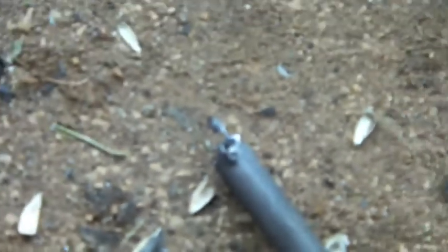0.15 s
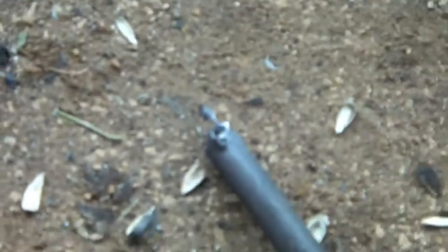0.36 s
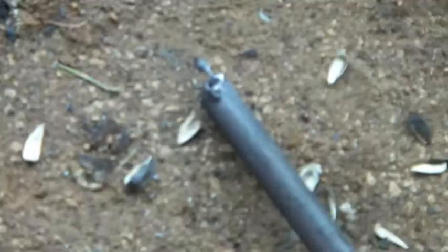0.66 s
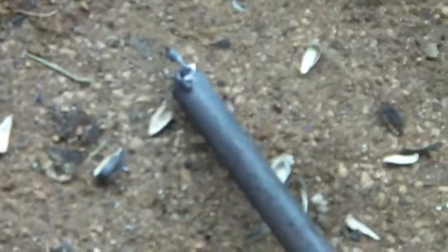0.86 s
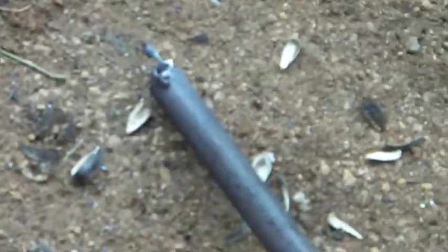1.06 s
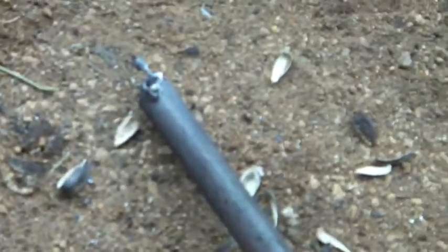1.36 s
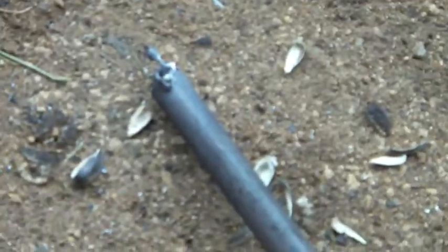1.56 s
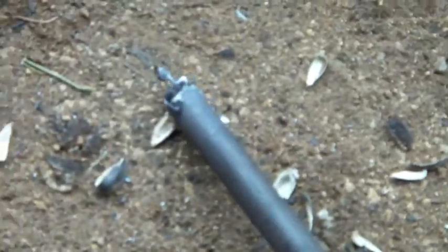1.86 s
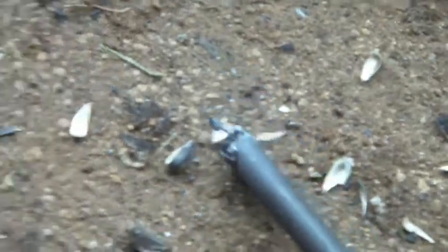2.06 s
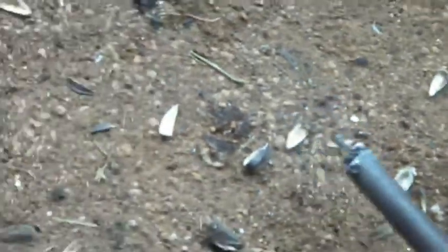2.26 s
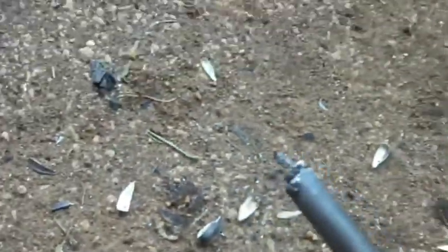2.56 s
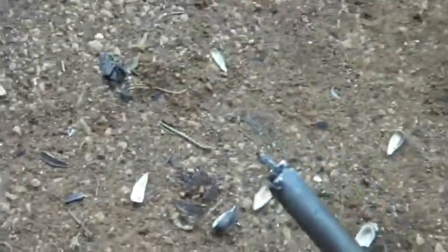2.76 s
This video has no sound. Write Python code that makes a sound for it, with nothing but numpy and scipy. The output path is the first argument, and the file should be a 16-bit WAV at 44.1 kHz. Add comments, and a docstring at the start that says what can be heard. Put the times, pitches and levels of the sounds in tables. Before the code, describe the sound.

Steady blower whine and rushing air through pipes outdoors, interrupted by a short hollow thumping and scraping

```python
"""First a steady whistle over roaring, hissing air: an electric blower feeds an outdoor furnace through pipes.
The whistle is sine partials of the impeller; roar and hiss are shaped noise, the roar also through pipe resonances.
Nearby something hollow is bumped and dragged: gliding sine modes make thumps, low noise its rumble.
Small hard taps ring decaying modes, and short noise bursts are grit scraping on the ground.
A pair of close microphone ports listens."""
import sys
import numpy as np
from scipy import signal
from scipy.fft import rfft, irfft, next_fast_len
from scipy.io import wavfile
from scipy.ndimage import uniform_filter1d, map_coordinates

SR = 44100
rng = np.random.default_rng(int(sys.argv[2]) if len(sys.argv) > 2 else 0)


def master_out(mix):
    """Clip the mix to full scale and print it as 16-bit PCM to the path in sys.argv[1]."""
    frames = np.transpose(np.atleast_2d(mix))
    ceiling = np.clip(frames, -1, 1)
    pcm = np.round(ceiling * 32767).astype(np.int16)
    wavfile.write(sys.argv[1], SR, pcm)


N = 127890
TIME_S = np.arange(N) / SR

# Low rumble of the thing being dragged: time_s [s], level_db [dB]
DRAG_LEVEL = [(.52, -80), (.57, -33), (.8, -31), (1.0, -32), (1.2, -34), (1.3, -62.5)]
# Colour of that rumble: freq_hz [Hz], relative_db [dB per Hz]
DRAG_COLOUR = [(60, -42), (100, -12.5), (170, -15), (240, 7), (300, 2.5), (400, -44)]

# Grit scrapes: start_s [s], level_db [dB], rise_s [s], decay_s [s]
SCRAPES = [(.682, -21.5, 0.0052, 0.0074), (.768, -26, .004, 0.0096), (0.8019, -16, .0008, 0.005),
           (0.815, -25, 0.0018, .008), (.832, -31, 0.0034, 0.013), (.965, -33.5, 0.032, 0.015),
           (1.02, -30, 0.013, .012), (1.04, -29, .008, 0.011)]
# Colour of the grit: freq_hz [Hz], relative_db [dB per Hz]
GRIT_COLOUR = [(700, -36), (1400, 3.5), (3000, -4.5), (5000, -5.5), (8000, -10.5), (12000, -15.5)]
GRIT_ROUGH_DB = 2

# Taps on a small hard thing: start_s [s], strike_db [dB], most excited pitch_hz [Hz]
TAPS = [(.669, -20.5, 3000), (.676, -20, 1500), (.687, -17.5, 2500), (0.694, -22.5, 5200),
        (.706, -17, 1800), (0.772, -19.5, 2000), (0.8021, -16, 3360), (0.8033, -16, 1900),
        (0.8047, -15.5, 1600), (0.8122, -23.5, 3000), (0.8178, -24, 4400), (.997, -23, 3400)]
# Ringing modes of the tapped thing: pitch_hz [Hz], relative_db [dB], t60_s [s]
TAP_MODES = [(1466, 0, .03), (1796, -1, 0.062), (2477, -3.5, .04), (2740, -0.5, 0.022), (2960, -4, 0.043),
             (3400, -5, 0.016), (3660, 2.5, .018), (4180, -4, .018), (4400, -5, 0.018), (5080, -12, .018),
             (5300, 0.5, 0.023)]
TAP_FALL_DB = 12  # lost per octave away from the most excited pitch
TAP_RISE_S = .0003

# Hollow thumps: start_s [s], strike_db [dB], pitch_hz [Hz], glide_hz_per_s [Hz/s]
THUMPS = [(.558, -9.5, 235.5, 700), (0.659, -15, 235, 400), (.69, -14, 272, 100), (.724, -12.5, 220, -100),
          (.745, -16.5, 240, -200), (0.786, -17, 212, 0), (.862, -9.5, 234, 150), (.911, -18, 200, 0),
          (.977, -10, 284, 95), (1.089, -19, 258, 0), (1.155, -11.5, 234, 150), (1.17, -15.5, 172, -4),
          (1.22, -18, 176, 0)]
# Modes of the hollow thing: ratio to pitch [1], relative_db [dB]
HOLLOW_MODES = [(1, 3), (0.487, -12.5), (1.3, -8.5)]
THUMP_T60_S, THUMP_RISE_S = 0.13, 0.0085
THUMP_CUT_HZ = 127  # the microphone's bass roll-off, as it dulls the bumps

# Course of the rushing air, before the trims: time_s [s], roar_db [dB], hiss_db [dB]
AIR_LEVEL = [(0, -19, -27.5), (.3, -19.5, -26.5), (.52, -19, -27), (0.89, -21, -28), (0.98, -21.5, -26.5),
             (1.12, -19, -27.5), (1.31, -21.5, -28), (1.42, -19.5, -27.5), (1.8, -20, -27.5),
             (1.92, -18.5, -26.5), (2.19, -20.5, -27.5), (2.9, -20, -28)]
ROAR_TRIM_DB, HISS_TRIM_DB = 1.28, 2.34
GUST_DB = 0.18  # random swells of the roar
# Colour of the roar: freq_hz [Hz], relative_db [dB per Hz]
ROAR_COLOUR = [(18, -81), (30, -62), (102, -31.5), (158, -17.5), (214, -15.5), (305, -8), (353, -3.5),
               (402, -3), (460, -0.5), (515, 2.5), (560, -3.5), (622, -10.5), (700, -6.5), (910, -60),
               (1540, -120)]
# Pipe resonances: centre_hz [Hz], width_hz [Hz], relative_db [dB]
PIPE_MODES = [(718, 125, -0.5), (769, 45, -0.5), (864, 126, -3), (954, 120, 0), (1241, 28, -5),
              (1554, 110, -11)]
PIPE_DB = -5  # against the roar
# Colour of the hiss: freq_hz [Hz], relative_db [dB per Hz]
HISS_COLOUR = [(600, -23.5), (1000, -5.5), (1400, -11), (1900, -14.5), (2500, -14.5), (3200, -16),
               (3800, -20), (5000, -19.5), (6500, -22.5), (8000, -24.5), (10000, -29.5), (11000, -26.5),
               (11600, -33.5), (12300, -51)]
# Narrow dips in the rush of air: centre_hz [Hz], width_hz [Hz], gain_db [dB]
AIR_DIPS = [(693, 24.5, -10), (803, 24, -5.5)]

# Course of the blade whistle: time_s [s], level_db [dB]
WHISTLE_LEVEL = [(0, -25), (.06, -28), (.15, -21), (.26, -21.5), (.36, -20), (.65, -21), (.78, -22.5),
                 (.95, -17), (1.08, -21), (1.22, -22), (1.38, -19), (1.9, -18.5), (2.15, -19), (2.35, -16),
                 (2.65, -17.5), (2.9, -17.5)]
# Shaft tones: multiple of the shaft speed [1], level_db against the mean whistle [dB], waver_db [dB]
SHAFT_ORDERS = [(1, -26, 4), (2, -11, 2.5)]
# Faint motor tones: pitch_hz [Hz], level_db [dB rms, before the waver]
MOTOR_TONES = [(2535, -52), (4409, -60)]
SHAFT_HZ, DRIFT_HZ, BLADES = 178.8, 0.061, 5
RIPPLE_HZ, RIPPLE_DEPTH = 118, 0.15  # torque ripple that swells the whistle
WHISTLE_WAVER_DB, MOTOR_WAVER_DB = -0.04, 6
OVERTONE_DB, OVERTONE_GROWS = -26, 1.9  # second partial against the mean whistle; swings wider than it

# Likeness of the noise at the two ports: freq_hz [Hz], left-right correlation [1]
PORT_LIKENESS = [(100, .99), (600, 0.98), (1200, 0.91), (2600, 0.82), (5500, 0.73), (8000, 0.22),
                 (11700, 0.92)]
# Balance of the ports: freq_hz [Hz], left_over_right_db [dB]
PORT_BALANCE = [(60, 1.5), (170, 1), (490, 0.5), (1420, 0.5), (4080, -0.5), (11700, -0.5)]
LEFT_LAG_S = .00003
TOP_HZ = 12300


def amp(db):
    """dB to gain."""
    return 10 ** (np.asarray(db) / 20)


def unit(x):
    """Scaled to rms 1."""
    return x / np.sqrt(np.mean(x ** 2) + 1e-20)


def along(points, hz):
    """Values of (Hz, value) points read along a log frequency axis."""
    f, v = np.transpose(points)
    return np.interp(np.log(hz + 1), np.log(f + 1), v)


def over_time(points):
    """Values of (s, value) points joined by straight lines."""
    return np.interp(TIME_S, *np.transpose(points))


def wobble(rate):
    """A smooth random curve, rate knots a second."""
    knots = rng.standard_normal(int(N * rate / SR) + 4)
    return map_coordinates(knots, [np.arange(N) * rate / SR])


def filtered(x, response):
    """x times a complex response of frequency."""
    m = next_fast_len(N + SR // 2)
    return irfft(rfft(x, m) * response(np.fft.rfftfreq(m, 1 / SR)), m)[..., :N]


def shape(spectrum):
    """Gain of (Hz, dB) points, silent below half the first and level above the last."""
    return lambda hz: amp(along(spectrum, hz)) * (hz >= spectrum[0][0] / 2)


def resonance(hz, centre_hz, width_hz):
    """Bell of height 1, down to a half at the edges of its width."""
    return 1 / (1 + ((hz - centre_hz) / (width_hz / 2)) ** 2)


def rush(gain, patchy_db):
    """Stereo noise of rms 1, its time-frequency patches randomly louder or softer."""
    z = signal.stft(rng.standard_normal((2, N)), nperseg=512)[2]
    field = rng.standard_normal(z.shape[1:])
    field = uniform_filter1d(uniform_filter1d(field, 8, 0), 10, 1)
    pair = signal.istft(z * amp(patchy_db * unit(field)), nperseg=512)[1][:, :N]

    def mid_side_gain(hz):
        # the angle between mid and side sets the likeness of left and right
        angle = np.arccos(np.clip(along(PORT_LIKENESS, hz), -1, 1)) / 2
        return gain(hz) * np.array([np.cos(angle), np.sin(angle)])

    mid, side = filtered(pair, mid_side_gain)
    return unit(np.array([mid + side, mid - side]))


def drag():
    """Lumpy low noise of a thing dragged along."""
    level_db = over_time(DRAG_LEVEL) + 2.6 * wobble(14.9)
    return amp(level_db) * rush(shape(DRAG_COLOUR), patchy_db=1.1)


def scrapes():
    """Quick rough bursts of grit: a straight rise, then an exponential tail."""
    stroke = np.zeros(N)
    for start_s, level_db, rise_s, decay_s in SCRAPES:
        age_s = TIME_S - start_s
        rise = np.clip(age_s / rise_s, 0, 1)
        tail = np.exp(-np.clip(age_s - rise_s, 0, None) / decay_s)
        stroke += amp(level_db) * rise * tail
    roughness = amp(GRIT_ROUGH_DB * wobble(700))
    return stroke * roughness * rush(shape(GRIT_COLOUR), patchy_db=1.0)


def taps():
    """Each tap rings the same modes, most of all those near its own pitch."""
    out, t = np.zeros(N + SR), np.arange(SR // 8) / SR
    for start_s, strike_db, centre_hz in TAPS:
        ring = np.zeros(len(t))
        for hz, mode_db, t60_s in TAP_MODES:
            far_db = TAP_FALL_DB * abs(np.log2(hz / centre_hz))
            level_db = mode_db - far_db + rng.normal(0, 1.7) - 60 * t / t60_s
            ring += amp(level_db) * np.sin(2 * np.pi * hz * t + rng.uniform(0, 2 * np.pi))
        start = round(start_s * SR)
        out[start:start + len(t)] += amp(strike_db) * (1 - np.exp(-t / TAP_RISE_S)) * ring
    return out[:N]


def thumps():
    """Soft bumps that ring a hollow thing's low modes, gliding in pitch as they die."""
    out, t = np.zeros(N + SR), np.arange(SR // 4) / SR
    for start_s, strike_db, hz, glide in THUMPS:
        cycles = (hz + glide * t / 2) * t
        ring = np.zeros(len(t))
        for ratio, mode_db in HOLLOW_MODES:
            ring += amp(mode_db + rng.normal(0, 1.6)) * np.sin(2 * np.pi * ratio * cycles)
        envelope = amp(strike_db - 60 * t / THUMP_T60_S) * (1 - np.exp(-t / THUMP_RISE_S))
        start = round(start_s * SR)
        out[start:start + len(t)] += envelope * ring
    return filtered(out[:N], lambda hz: (1j * hz / (THUMP_CUT_HZ + 1j * hz)) ** 3)


def roar(level_db):
    """Turbulent air as low noise, part of it coloured by the pipe resonances."""
    def pipe(hz):
        return np.sqrt(sum((amp(db) * resonance(hz, c, w)) ** 2 for c, w, db in PIPE_MODES))

    air = rush(shape(ROAR_COLOUR), patchy_db=0.4) + amp(PIPE_DB) * rush(pipe, patchy_db=1.0)
    return amp(level_db + ROAR_TRIM_DB + GUST_DB * wobble(3.9)) * air


def hiss(level_db):
    """Escaping air as bright noise, its level fluttering at three speeds."""
    flutter_db = 0.29 * wobble(4.8) + 0.24 * wobble(19) + 0.61 * wobble(39.78)
    return amp(level_db + HISS_TRIM_DB + flutter_db) * rush(shape(HISS_COLOUR), patchy_db=0.63)


def whistle():
    """Impeller tones locked to the shaft: blade passing, its second partial and low shaft orders."""
    level_db = over_time(WHISTLE_LEVEL)
    mean_db = level_db.mean()
    turn = 2 * np.pi * np.cumsum(SHAFT_HZ + DRIFT_HZ * wobble(5.45)) / SR
    ripple = 1 + RIPPLE_DEPTH * np.sin(2 * np.pi * RIPPLE_HZ * TIME_S + 0.76 * wobble(8.27))
    tones = amp(level_db + WHISTLE_WAVER_DB * wobble(11.9)) * ripple * np.sin(BLADES * turn)
    for order, db, waver_db in SHAFT_ORDERS:
        tones += amp(mean_db + db + waver_db * wobble(6.16)) * np.sin(order * turn)
    overtone_db = mean_db + OVERTONE_DB + OVERTONE_GROWS * (level_db - mean_db) + 2.2 * wobble(8)
    tones += amp(overtone_db) * np.sin(2 * BLADES * turn)
    return np.sqrt(2) * tones  # sine levels are rms


def motor():
    """Faint steady-pitched sines whose levels waver."""
    tones = sum(amp(db + MOTOR_WAVER_DB * wobble(4.7)) * np.sin(2 * np.pi * hz * TIME_S)
                for hz, db in MOTOR_TONES)
    return np.sqrt(2) * tones


def blower():
    """Whistle and motor tones over the rush of air, which has narrow dips in its spectrum."""
    time_s, roar_db, hiss_db = np.transpose(AIR_LEVEL)
    air = roar(np.interp(TIME_S, time_s, roar_db)) + hiss(np.interp(TIME_S, time_s, hiss_db))

    def dips(hz):
        return amp(sum(db * resonance(hz, c, w) for c, w, db in AIR_DIPS))

    return whistle() + motor() + filtered(air, dips)


def scene():
    """Everything reaches the left port a little later, and each port has its own colour."""
    sources = drag() + scrapes() + taps() + thumps() + blower()
    side = np.array([[1], [-1]])  # left, right: each takes half the balance and half the lag

    def ports(hz):
        balance = amp(side * along(PORT_BALANCE, hz) / 2)
        return balance * np.exp(-1j * np.pi * side * hz * LEFT_LAG_S)

    return filtered(sources, ports)


def record(dry):
    """The recorder passes nothing from its band limit upwards."""
    return filtered(dry, lambda hz: hz < TOP_HZ)


dry = scene()
out = record(dry)
master_out(out)
```